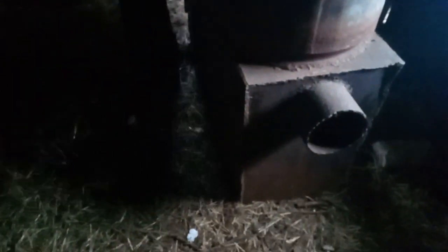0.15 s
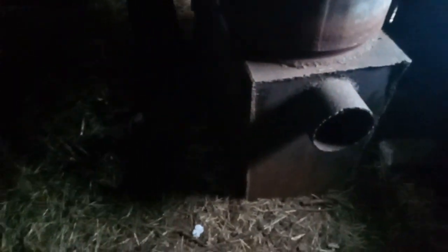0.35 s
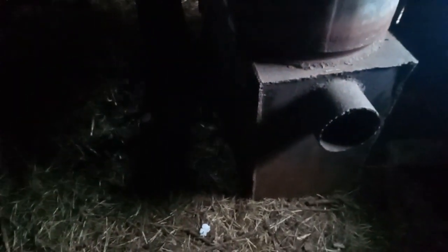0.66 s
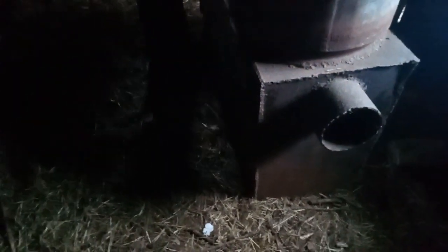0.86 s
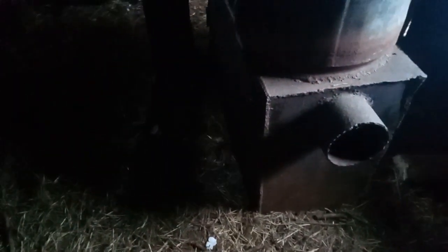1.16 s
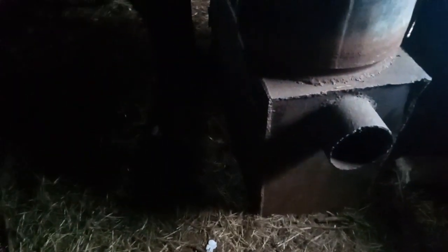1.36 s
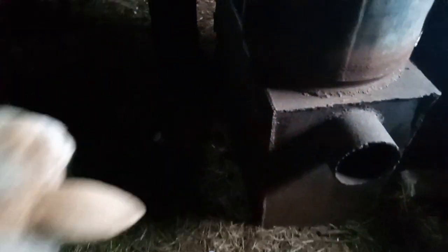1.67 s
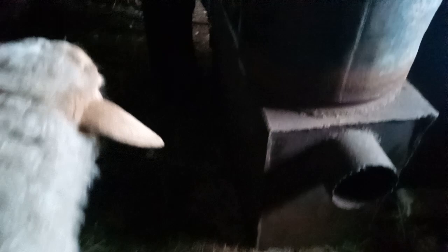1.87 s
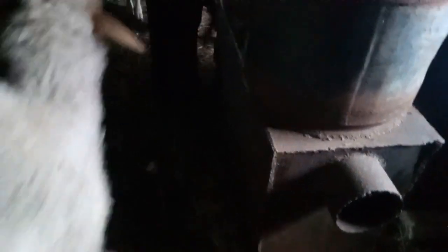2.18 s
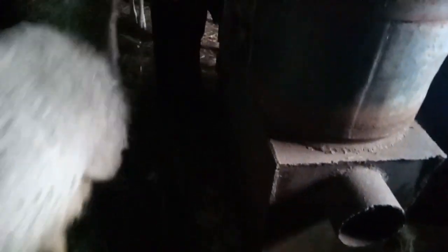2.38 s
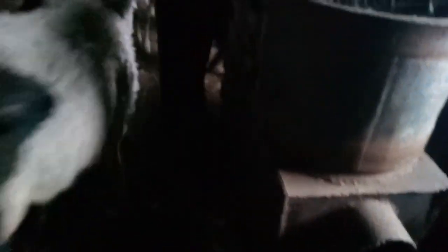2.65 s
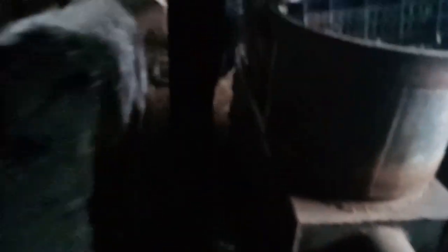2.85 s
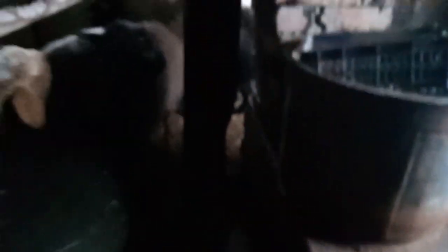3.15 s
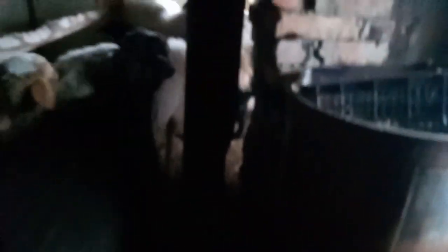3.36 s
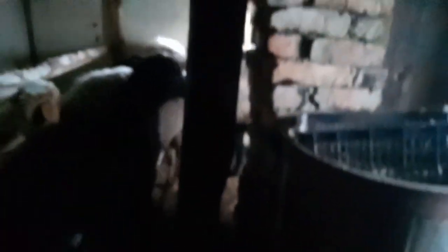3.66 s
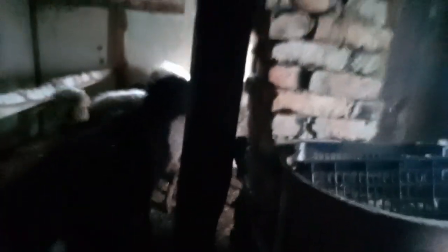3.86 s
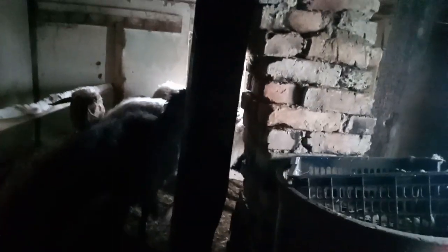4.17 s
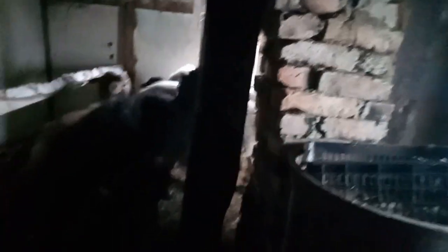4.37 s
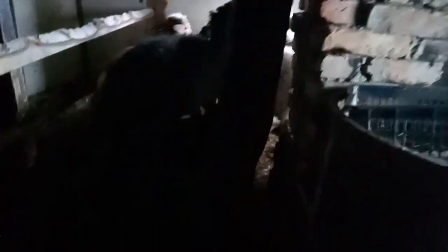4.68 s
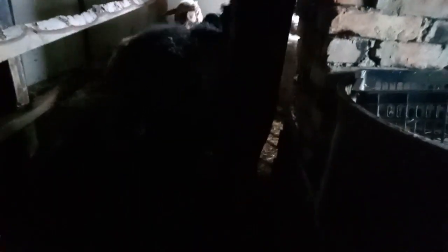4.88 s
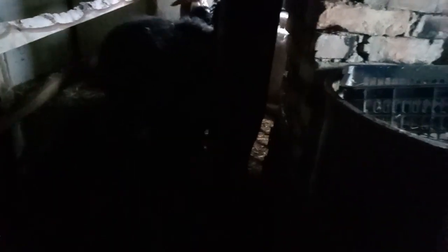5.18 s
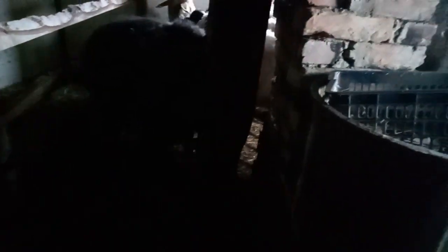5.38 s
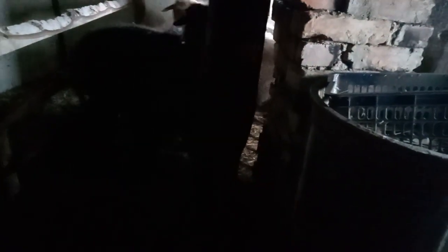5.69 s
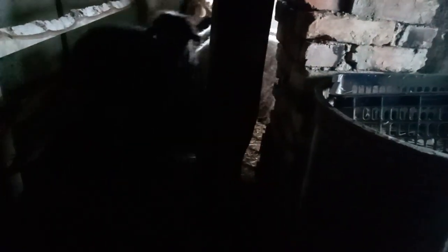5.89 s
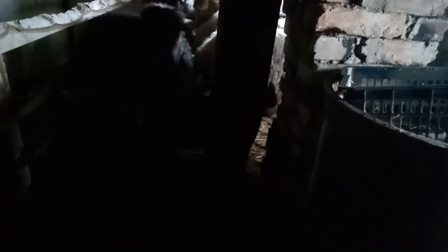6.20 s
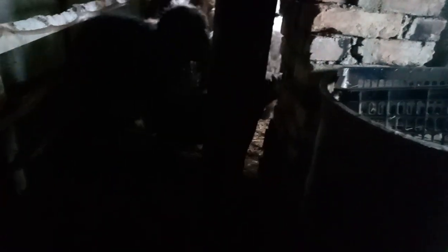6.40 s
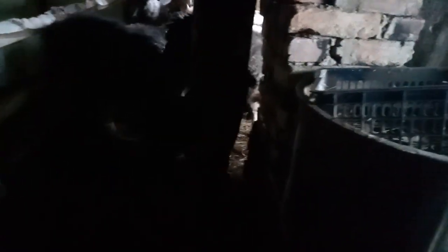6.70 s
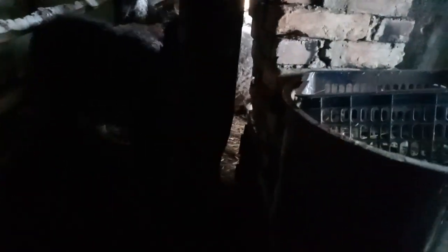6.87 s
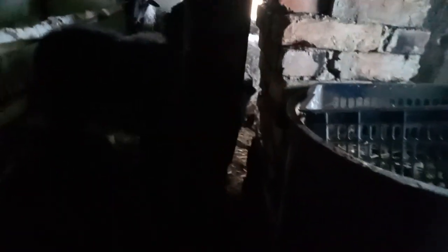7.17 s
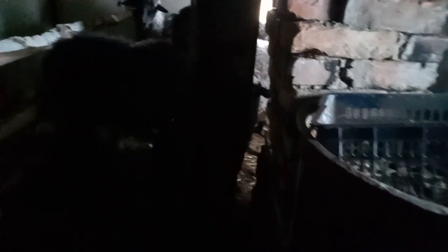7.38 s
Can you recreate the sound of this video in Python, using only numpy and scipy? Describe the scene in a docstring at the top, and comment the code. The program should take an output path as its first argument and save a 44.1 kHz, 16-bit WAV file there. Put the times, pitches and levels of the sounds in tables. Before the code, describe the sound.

Inside a small shed, a nearby microphone catches animals moving on straw bedding: dry crackle, snapping stalks, low muffled hoof steps and little knocks on boards. After a busy middle and a calmer spell, one body slams the planks loudly, boomy and clattering. A woody knock comes over a second later, with a few softer bumps, then near quiet. Reflections are short and the background air is faint.

```python
"""Sheep in a straw-bedded pen

Sheep shuffle over straw in a small shed and bump against the boards of their pen.
Knocks and rattles ring four families of board modes; hooves ring two low modes of the earth floor.
Stalks snap as clicks with a grainy crunch; rustle and tread are coloured crackle that swells with the motion.
Dense reflections answer the close contacts, over still air; the microphone cuts both ends and rounds peaks."""
import sys
import numpy as np
from scipy import signal
from scipy.fft import rfft, irfft
from scipy.io import wavfile

SR = 44100
rng = np.random.default_rng(int(sys.argv[2]) if len(sys.argv) > 2 else 0)


def generate_wav(sig):
    """Save sig (samples, or channels by samples) to the path in sys.argv[1] as 16-bit PCM at SR."""
    pcm = np.round(np.clip(np.atleast_2d(sig).T, -1, 1) * 32767).astype(np.int16)
    wavfile.write(sys.argv[1], SR, pcm)


N = 332514   # samples

# blows on the boards: start_s, blow_db, weight_db, hardness_db, own_pitch_hz, rattle_t60_s (before family stretch)
KNOCKS = [(0.014, -43, -0.5, -10, 895, 0.018), (0.249, -61.5, 4, 11, 1470, 0.022),
          (0.308, -65.5, -16, 9.5, 2180, .049), (1.306, -68.5, 8, 12.5, 1440, 0.055),
          (1.365, -33, 8.5, -73, 238, 0.034), (1.446, -67.5, 26, 20, 1150, 0.095),
          (1.629, -54, -5, 15.5, 1080, 0.058), (1.754, -57.5, -41, -10, 282, 0.088),
          (1.959, -43, 6.5, -9.5, 710, 0.017), (2.229, -56.5, -16, 4, 690, 0.031),
          (2.296, -42.5, -1.5, 0, 730, 0.0017), (2.422, -54, -17, 11, 1420, 0.053),
          (2.5, -64.5, -12, 8.5, 1930, .037), (2.614, -46, -2.5, 0.5, 685, 0.029),
          (2.69, -50.5, -1, 6, 3140, 0.024), (2.804, -66.5, -2, 16.5, 3200, 0.046),
          (3.004, -48, 6.5, 0.5, 660, 0.021), (3.134, -60, 11, 3.5, 870, 0.033),
          (3.21, -57, 4, 3, 2120, 0.068), (3.276, -55.5, -18, -1, 1490, .061),
          (3.345, -51, 4.5, -25, 730, 0.062), (3.438, -62, 8, 10, 830, 0.081),
          (3.589, -67, 19, 17.5, 1410, 0.17), (3.889, -67, 18, 16, 670, 0.093),
          (4.15, -64.5, -6, 7, 507, .028), (4.256, -55, 10.5, -28, 436, 0.005),
          (4.309, -56, 9, 3.5, 610, 0.056), (4.363, -60.5, 21.5, -1, 640, 0.086),
          (4.483, -57, 18.5, -2.5, 666, 0.086), (4.61, -57, 5, -14, 462, 0.026),
          (4.653, -52.5, 13, -20.5, 453, 0.032), (4.711, -50.5, -5, -15.5, 457, 0.044),
          (4.756, -14.5, 1.5, -12.5, 429.7, .06), (4.769, -15, 2.5, -6.5, 3070, 0.064),
          (4.791, -20.5, 6, -27, 147, 0.23), (5.256, -62, 10, -12.5, 323, 0.022),
          (5.43, -56.5, 14.5, -5, 335, 0.069), (5.533, -56.5, -11, -35, 304, 0.054),
          (5.866, -52, 13.5, 5.5, 543, 0.12), (5.932, -56, 12, -11, 1007, 0.059),
          (5.99, -59, 13.5, 8.5, 383, .088), (6.124, -20, -2, 1.5, 335, 0.074),
          (6.139, -34, 1.5, 6.5, 1044, 0.045), (6.397, -59.5, -10, 4.5, 900, 0.056),
          (6.432, -57.5, -6, -1, 1110, 0.043), (6.48, -77, 10, 21, 2600, 0.12),
          (6.508, -78, 14, 17, 1790, 0.044), (6.568, -39.5, -7, -6.5, 459, 0.044),
          (6.609, -61, -28, 2, 343, 0.13)]
# board modes in four families, low to high: mode_hz, level_db, t60_s
PANEL_MODES = [(116.16, -10, 0.31), (128, -1.5, 0.18), (161.2, -3, .2), (174, -10, 0.15)]
PLANK_MODES = [(193, -12, 0.42), (203, -2, 0.15), (247, -5.5, 0.21), (276, -2.5, 0.13), (300.6, 4, 0.063),
               (361, -2.5, 0.081), (413.2, -3.5, 0.084), (460, -5, 0.087)]
EDGE_MODES = [(507, -4, 0.06), (565, -2.5, 0.064), (650.7, 4, 0.045), (798, -2, 0.043), (911, -4, 0.046),
              (1033, -2, 0.056), (1176, 8, 0.014), (1420, 4.5, 0.02)]
CRACK_MODES = [(1563, -0.5, .02), (1724, -1.5, 0.035), (1883, -0.5, 0.025), (2113, -0.5, 0.022),
               (2326, -3, 0.03), (2584, -2, 0.013), (2960, -4, 0.017), (3565, -2.5, 0.012),
               (4370, -3, 0.004), (5130, -13.5, 0.0055), (5800, -14.5, 0.0077)]
# band each family radiates: low_hz, high_hz
FAMILY_BANDS = [(100, 220), (170, 750), (430, 1240), (1250, 9300)]
# first push into each family; flesh and hoof are too soft to drive the crack modes fully: push_db
PUSH_DB = (7.5, 2.5, 2.5, -8)
# hooves on packed earth: start_s, thud_db, deep_db
HOOVES = [(0.26, -61, -50), (0.507, -47, -62), (0.723, -45.5, -48.5), (1.588, -42, -52), (1.819, -42, -47),
          (1.884, -41, -48), (2.03, -42, -46.5), (2.569, -31, -48), (3.141, -42, -43), (3.238, -35, -68),
          (3.542, -39.5, -70), (3.723, -36, -59), (3.833, -37, -61), (4.369, -40.5, -48.5),
          (4.493, -31, -67.5), (4.814, -24, -21), (4.889, -37, -47), (4.978, -29.5, -35.5),
          (5.308, -49, -44), (5.761, -37.5, -64), (5.887, -28, -56), (5.95, -51, -58.5),
          (6.017, -44, -83.5), (6.215, -37, -79.5), (6.342, -34, -68), (6.489, -39, -71), (6.54, -57, -41),
          (6.627, -34.5, -42), (6.897, -84, -56), (7.042, -42, -50), (7.269, -48, -76.5)]
# single stalks breaking: start_s, level_db
SNAPS = [(0.0138, -45), (0.253, -42.5), (0.7623, -55), (1.0854, -56), (1.1923, -54), (1.3098, -47.5),
         (1.4566, -44), (1.6312, -42), (1.66, -50), (1.7554, -47), (1.769, -47.5), (1.8103, -47),
         (1.8786, -39), (1.941, -42), (1.963, -42.5), (2.0526, -42.5), (2.0787, -44), (2.4354, -34),
         (2.5625, -40.5), (2.6116, -34.5), (2.69, -31.5), (2.7885, -44.5), (2.8754, -51), (2.9552, -53),
         (2.9833, -45), (3.0081, -40.5), (3.053, -40.5), (3.0952, -47), (3.2096, -42.5), (3.2789, -36),
         (3.349, -40.5), (3.439, -48.5), (3.5083, -44.5), (3.5512, -49), (3.5874, -32), (3.645, -48),
         (3.9933, -46), (4.3126, -46.5), (4.334, -57), (4.371, -59), (4.9604, -55), (4.9861, -49.5),
         (5.6351, -54.5), (5.8494, -46.5), (5.9404, -47), (5.9623, -63), (6.0566, -56), (6.1025, -50),
         (6.127, -34), (6.279, -45), (6.3202, -51), (6.3995, -56), (6.454, -55), (6.6088, -46),
         (6.7082, -44.5), (6.7665, -54), (7.0115, -61.5)]
# restlessness of the flock: time_s, rustle_db, tread_db
MOTION = [(0.0, -72, -44.5), (0.12, -66.5, -70.5), (0.42, -71.5, -67), (1.05, -73.5, -73),
          (1.82, -56.5, -51.5), (2.14, -61, -56), (2.62, -57.5, -56), (2.79, -58, -56),
          (3.48, -59.5, -63.5), (3.67, -65.5, -54.5), (4.26, -67, -53.5), (4.51, -69.5, -52.5),
          (4.85, -58.5, -36.5), (5.06, -69, -55.5), (5.78, -66, -61.5), (6.07, -65, -51.5),
          (7.05, -75, -68.5), (7.54, -75, -72.5)]
# a leg or flank through the straw: middle_s, rustle_db, dryness_db (re rustle), length_s
SWEEPS = [(-0.001, -54, -16, 0.18), (0.247, -57.5, -13, 0.16), (0.543, -72.5, -8, .15),
          (1.102, -71.5, -4.5, 0.23), (1.658, -64.5, 2, 0.13), (1.81, -85, -13, 0.11),
          (2.106, -57, 1.5, 0.073), (2.273, -62.5, -1, 0.2), (2.454, -55.5, 1, 0.23),
          (2.832, -75.5, 17.5, 0.21), (3.22, -74.5, 9.5, 0.24), (3.643, -61.5, -2, 0.3),
          (4.003, -62.5, -4, 0.44), (4.375, -66.5, -2, 0.29), (4.668, -70, -2, 0.2), (5.0, -71, -5, 0.16),
          (5.42, -69, -17, 0.1), (5.6, -73, -23, 0.087), (5.977, -61.5, 5.5, 0.17), (6.43, -65, -37, .12),
          (6.61, -52, -12, .1)]
# spectra of rustle, dry top, tread and still air: freq_hz, level_db (per Hz, relative)
STRAW_SPECTRUM = [(290, -34.5), (500, -1), (858, 3), (1010, -3), (1490, 0), (2400, -5), (3670, -4),
                  (5000, -52), (6500, -41.5), (11000, -120)]
DRY_SPECTRUM = [(2350, -41.5), (4000, 1), (4900, -4.5), (6660, -9.5), (9440, 3), (10600, -5),
                (15000, -11.5), (16000, -16)]
TREAD_SPECTRUM = [(41, -8.5), (70, -3.5), (130, 2), (278, -6.5), (353, -6), (412, -7), (458, -13),
                  (860, -30.5), (1200, -29), (1560, -50.5), (2640, -120)]
AIR_SPECTRUM = [(15, -69.5), (25, -19), (123, -7.5), (161, -17), (344, -17), (591, -19), (659, -20),
                (775, -30.5), (840, -20), (1100, -28), (2000, -24), (2220, -20), (16000, -56)]
# decay of the shed: freq_hz, t60_s
SHED_DECAY = [(60, 0.28), (500, 0.22), (2000, 0.083), (5000, 0.05), (12000, 0.08)]

EDGE_SHARE = 0.33   # part of the hardness that reaches the edge modes; crack modes get all
RATTLE_STRETCH = (1.0, 0.76, 0.97, 1.6)   # rattle t60 factor per family
BUILD_UP = 0.02   # rattle rise time as a share of its unstretched t60
PUSH_SPREAD_DB = 2.6
TICK_DB, TICK_FOLLOWS = -29, 0.69   # bright tick of a blow; share of the crack level it follows
EARTH_HZ, EARTH_T60_S, THUD_HZ, THUD_T60_S = 46, 0.5, 133.2, 0.22
CRUNCH_T60_S = 0.049
DRY_DB = -7.5   # re rustle
RUMBLE_DB, RUMBLE_WANDER_DB = -10, 3   # re tread
SHED_DB, AIR_DB = -13.5, -71
CUTOFF_HZ = 16250


def boards():
    """A push and a noisy rattle feed every family of modes, most near the struck board's own pitch."""
    start_s, plank_db, weight_db, hard_db, own_hz, rattle_s = np.transpose(KNOCKS)
    panel_db = plank_db + weight_db
    edge_db = plank_db + EDGE_SHARE * hard_db
    crack_db = plank_db + hard_db
    at = np.round(start_s * SR).astype(int)
    scuff_db = -100 * rattle_s   # long scuffs have hardly any first push
    families = zip((PANEL_MODES, PLANK_MODES, EDGE_MODES, CRACK_MODES),
                   (panel_db, plank_db, edge_db, crack_db), PUSH_DB, FAMILY_BANDS, RATTLE_STRETCH)
    out = 0
    for modes, blow_db, push_db, (low_hz, high_hz), stretch in families:
        mode_hz, mode_db, t60_s = np.transpose(modes)
        octaves = np.log2(mode_hz[:, None] / own_hz)
        level_db = blow_db + mode_db[:, None] + 10 * np.exp(-(octaves / 0.4) ** 2)
        rattle = contacts(start_s, stretch * rattle_s, level_db + 1, BUILD_UP * rattle_s, order=2)
        force = rattle * rng.choice([-1, 1], N)
        chance_db = rng.normal(0, PUSH_SPREAD_DB, (len(at), len(mode_hz))).T
        force[:, at] += from_db(level_db + push_db + scuff_db + chance_db)
        rings = sum((-1) ** k * ring(force[k], mode_hz[k], t60_s[k]) for k in range(len(modes)))
        out = out + band(band(rings, low_hz, high_hz), low_hz / 2, 1.3 * high_hz)
    tick_db = TICK_DB + TICK_FOLLOWS * crack_db
    tick = contacts(start_s, rattle_s + 0.02, tick_db, 0.003, order=np.inf)[0]
    return out + tick * colour(rng.standard_normal(N), DRY_SPECTRUM)


def hooves():
    """Soft one-way pushes ring the floor's two low modes."""
    start_s, thud_db, deep_db = np.transpose(HOOVES)
    push_t60_s = 0.017 + 0 * start_s
    thud = contacts(start_s, push_t60_s, thud_db, 0.0012, order=1)[0]
    deep = contacts(start_s, push_t60_s, deep_db, 0.0025, order=1)[0]
    return band(ring(thud, THUD_HZ, THUD_T60_S), 60, 250) + band(ring(deep, EARTH_HZ, EARTH_T60_S), 25, 90)


def snaps():
    """Each broken stalk is a click and a short, weaker grainy crunch."""
    start_s, level_db = np.transpose(SNAPS)
    grains = crackle(per_s=5000, spread_db=3.0, clump_db=0, smooth=1.2)
    bright = colour(grains, DRY_SPECTRUM) + from_db(-2) * colour(grains, STRAW_SPECTRUM)
    click = contacts(start_s, 0.0028 + 0 * start_s, level_db - 4, 0.0003, order=np.inf)[0]
    crunch = contacts(start_s, CRUNCH_T60_S + 0 * start_s, level_db - 14.5, 0.009, order=np.inf)[0]
    return (click + crunch) * bright


def straw():
    """Bodies and legs drag through the bedding; their weight shakes floor and boards."""
    time_s, *columns = np.transpose(MOTION)
    rustle, tread = [from_db(np.interp(np.arange(N) / SR, time_s, db)) for db in columns]
    swept, swept_dry = sweeps()
    stalks = crackle(per_s=1200, spread_db=4.0, clump_db=2.5, smooth=1.7)
    steps = crackle(per_s=690, spread_db=4.0, clump_db=3.5, smooth=1.8)
    dragging = colour(scuffed(stalks, 435.0, per_s=9.4, t60_s=0.093, lift_db=-5), STRAW_SPECTRUM)
    treading = colour(scuffed(steps, 70, per_s=14.0, t60_s=0.53, lift_db=-1.5), TREAD_SPECTRUM)
    ground = rms_one(band(ring(rng.standard_normal(N), EARTH_HZ, 0.15), 25, 68))
    rumble = tread * from_db(RUMBLE_DB + RUMBLE_WANDER_DB * drift(2.5))
    dryness = from_db(DRY_DB) * rustle + swept_dry
    dry_top = dryness * colour(stalks, DRY_SPECTRUM)
    return (rustle + swept) * dragging + dry_top + tread * treading + rumble * ground


def sweeps():
    """Each sweep swells and fades as a squared cosine; gains for the rustle and its dry top."""
    t, out = np.arange(N) / SR, np.zeros((2, N))
    for middle_s, db, dry_db, length_s in SWEEPS:
        swell = np.cos(np.pi * np.clip((t - middle_s) / length_s, -0.5, 0.5)) ** 2
        out += np.outer(from_db([db, db + dry_db]), swell)
    return out


def crackle(per_s, spread_db, clump_db, smooth):
    """Tiny breaks of uneven size over a smooth hiss, both swelling in clumps."""
    sizes = from_db(spread_db * np.minimum(rng.exponential(1, N), 5)) * rng.choice([-1, 1], N)
    born = rng.random(N) < per_s / SR
    return from_db(clump_db * drift(13)) * (rms_one(sizes * born) + smooth * rng.standard_normal(N))


def scuffed(x, low_hz, per_s, t60_s, lift_db):
    """Small scuffs come at random, each lifting one half-octave for a moment."""
    out, fall = 0, from_db(-60 / (t60_s * SR))
    rise = fall ** 8   # softens the onset
    for low in low_hz * 2 ** np.arange(0, 4, 0.5):
        starts = (rng.random(N) < per_s / SR) * rng.exponential(1, N)
        decay = signal.lfilter([1], [1, -fall], starts)
        lift = signal.lfilter([1 - rise], [1, -rise], decay)
        out = out + band(x, low, min(1.392 * low, 0.45 * SR)) * (1 + from_db(lift_db) * lift)
    return out


def shed(x):
    """Dense reflections: noise with its own decay in each octave."""
    t, tail = np.arange(SR // 2) / SR, 0
    for low in 40 * 2.0 ** np.arange(9):
        noise = band(rng.standard_normal(len(t)), low, min(2 * low, 0.45 * SR))
        t60_s = at_hz(SHED_DECAY, np.sqrt(2) * low)
        dying = from_db(-60 * t / t60_s) * np.clip(t / 0.019, 0, 1)
        tail = tail + noise * dying / np.sqrt(np.sum(dying ** 2))
    return signal.fftconvolve(x, tail)[:N]


def still_air():
    """Steady coloured noise."""
    return from_db(AIR_DB) * colour(rng.standard_normal(N), AIR_SPECTRUM)


def contacts(times_s, t60s_s, levels_db, rise_s, order):
    """Contact envelopes scaled by area (order 1), energy (2) or peak (inf); one row per set of levels."""
    levels_db, t = np.atleast_2d(levels_db), np.arange(SR // 4) / SR
    out = np.zeros((len(levels_db), N + len(t)))
    for s, t60, db, rise in zip(times_s, np.maximum(t60s_s, 0.003), levels_db.T, rise_s + 0 * times_s):
        shape = from_db(-60 * t / t60) * (1 - np.exp(-t / rise))
        out[:, round(s * SR):][:, :len(t)] += np.outer(from_db(db), shape / np.linalg.norm(shape, order))
    return out[:, :N]


def ring(force, hz, t60_s):
    """Damped resonator: a unit click sets a sine of height 1 ringing."""
    r, w = from_db(-60 / (t60_s * SR)), 2 * np.pi * hz / SR
    return signal.lfilter([0, np.sin(w)], [1, -2 * r * np.cos(w), r * r], force + 1e-18)


def band(x, low_hz, high_hz):
    """Band-pass."""
    return signal.sosfilt(signal.butter(2, [low_hz, high_hz], "band", fs=SR, output="sos"), x)


def colour(x, spectrum):
    """Give a white signal a spectrum; rms 1."""
    hz = np.maximum(np.fft.rfftfreq(N, 1 / SR), 1)
    return rms_one(irfft(rfft(x) * from_db(at_hz(spectrum, hz)), N))


def drift(rate_hz):
    """Slow chance of rms 1: low-passed noise, computed every 40 samples."""
    r = np.exp(-80 * np.pi * rate_hz / SR)
    slow = signal.lfilter([1], [1, -2 * r, r * r], rng.standard_normal(N // 40 + 2002))[2000:]
    return np.interp(np.arange(N) / 40, np.arange(len(slow)), rms_one(slow))


def at_hz(points, hz):
    """Read a table on a log-frequency axis."""
    table_hz, values = np.transpose(points)
    return np.interp(np.log(hz), np.log(table_hz), values)


def rms_one(x):
    """Scale to rms 1."""
    return x / np.sqrt(np.mean(x ** 2) + 1e-20)


def from_db(db):
    """Decibels to gain."""
    return 10 ** (np.asarray(db) / 20)


def scene():
    """Close contacts with the shed's answer, the straw and the still air."""
    close = boards() + hooves() + snaps()
    return (close + from_db(SHED_DB) * shed(close) + straw() + still_air())[None]


def record(dry):
    """The microphone loses the deepest bass, the loudest peaks are rounded, the top is cut."""
    thin = signal.sosfilt(signal.butter(2, 36, "high", fs=SR, output="sos"), dry)
    ceiling = 1.1
    rounded = ceiling * np.tanh(thin / ceiling)
    return signal.sosfilt(signal.cheby2(16, 60, CUTOFF_HZ, fs=SR, output="sos"), rounded)


dry = scene()
out = record(dry)
generate_wav(out)
```